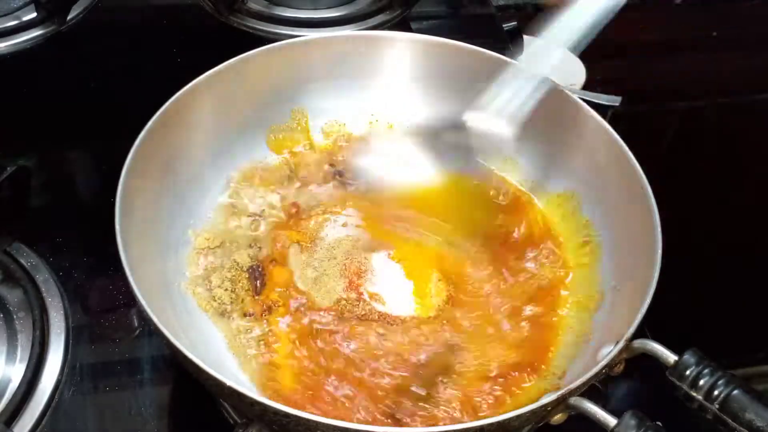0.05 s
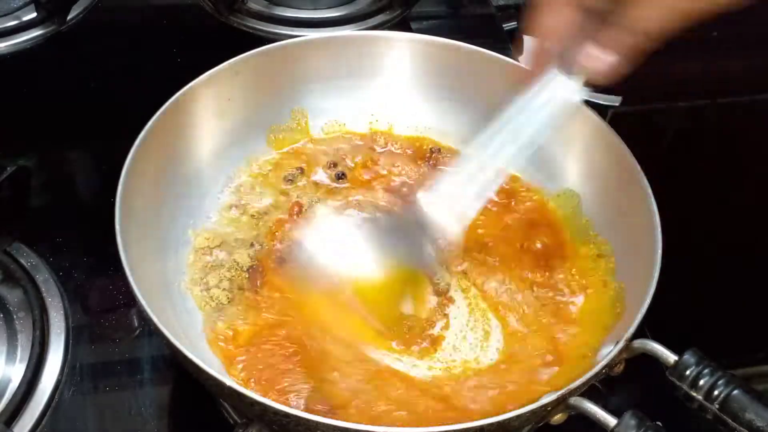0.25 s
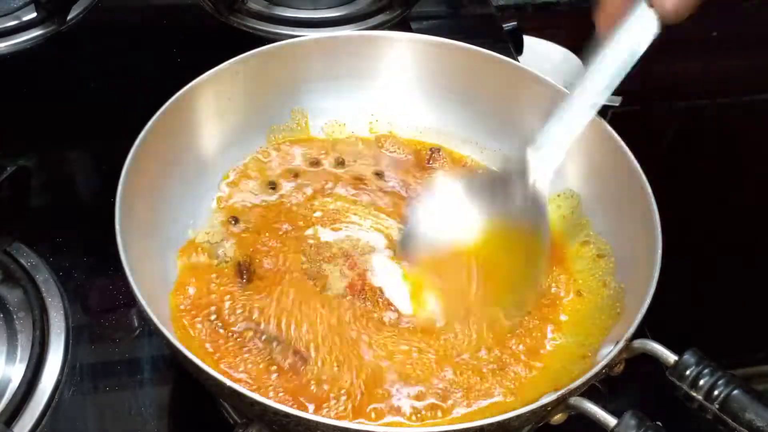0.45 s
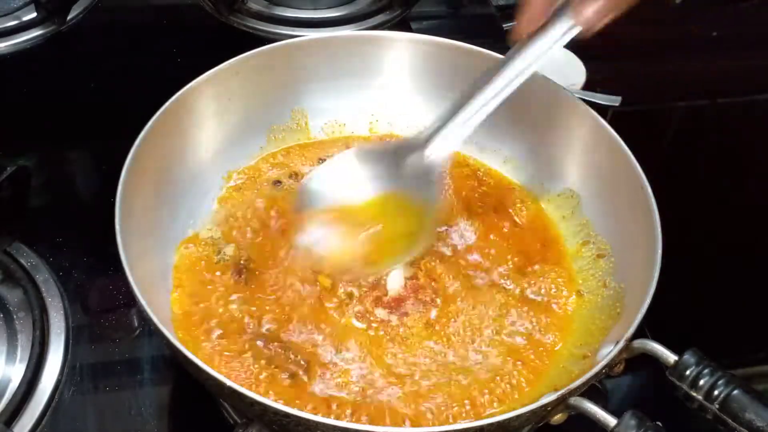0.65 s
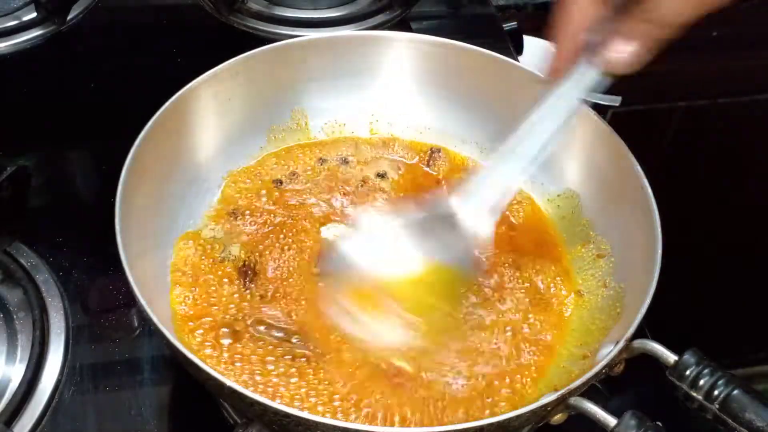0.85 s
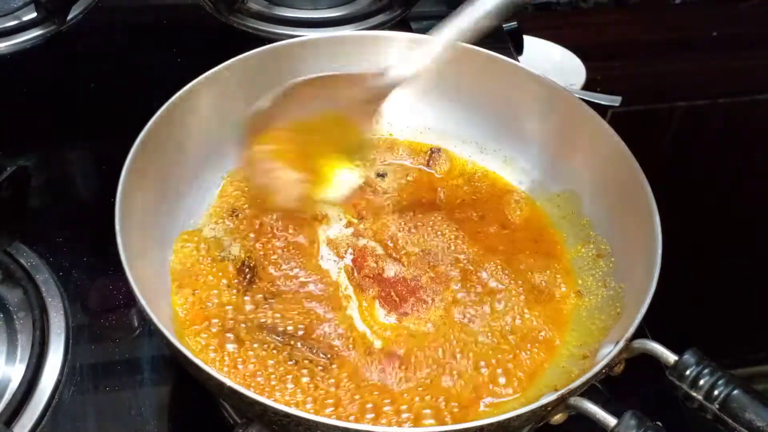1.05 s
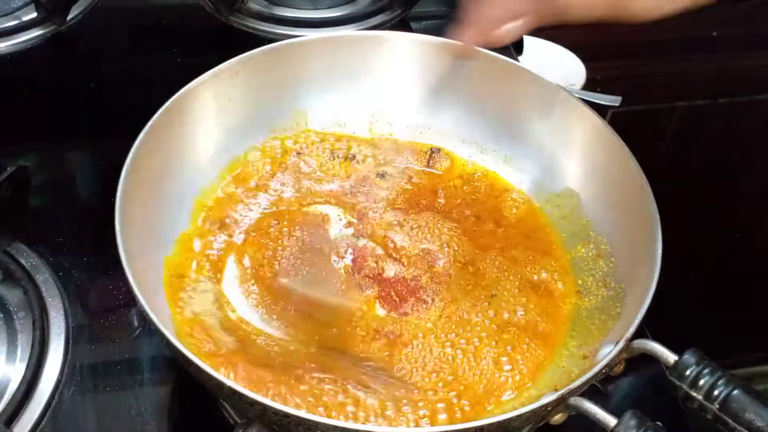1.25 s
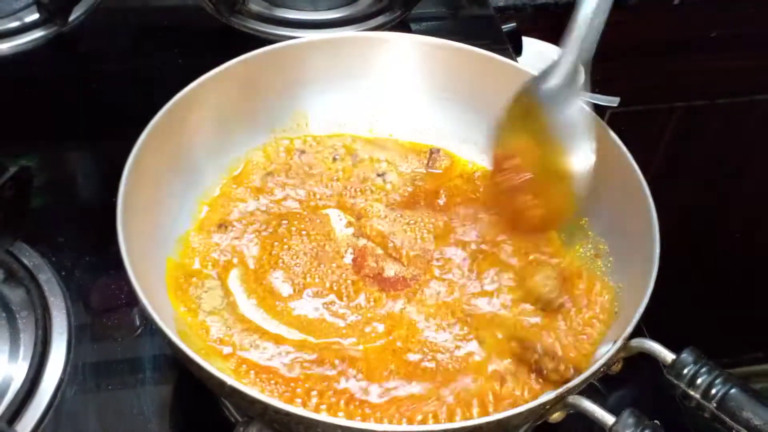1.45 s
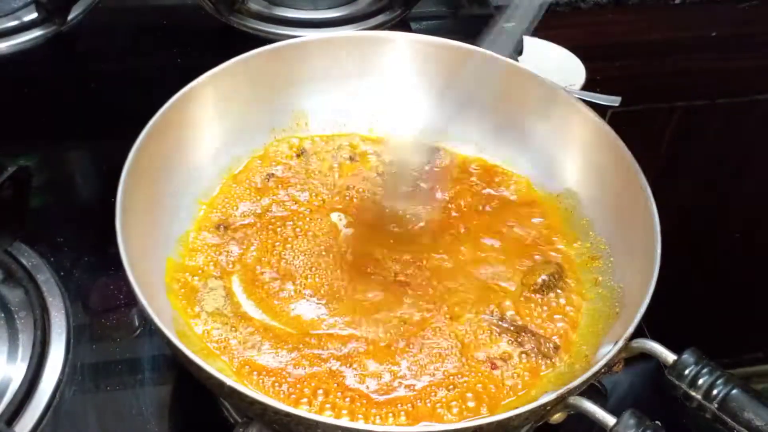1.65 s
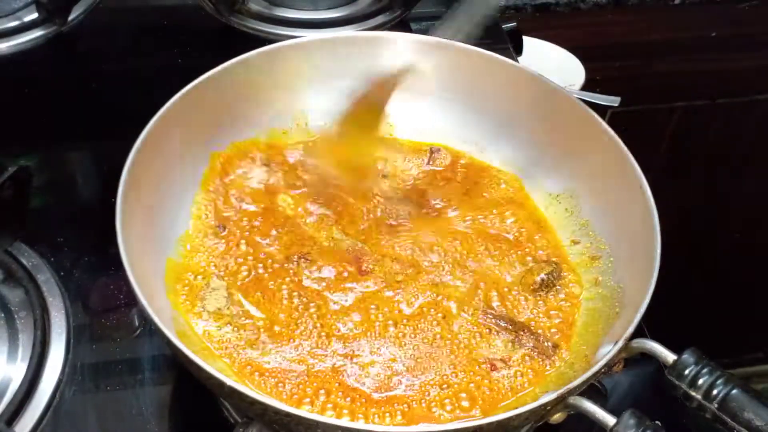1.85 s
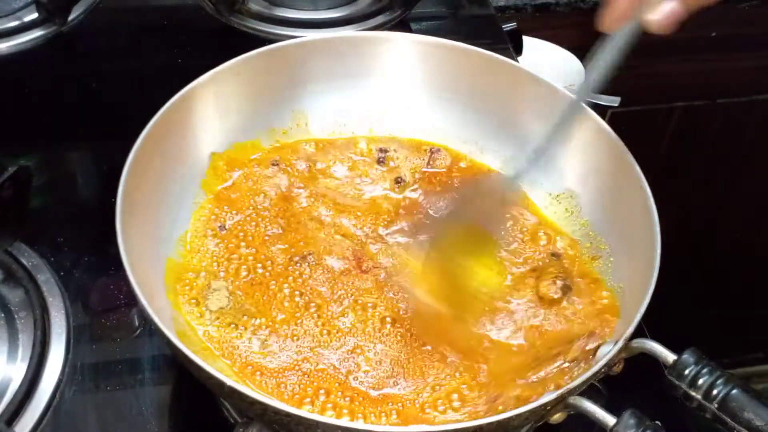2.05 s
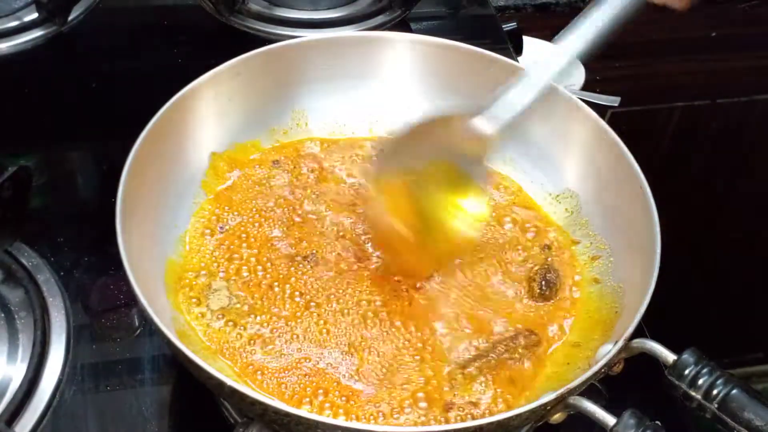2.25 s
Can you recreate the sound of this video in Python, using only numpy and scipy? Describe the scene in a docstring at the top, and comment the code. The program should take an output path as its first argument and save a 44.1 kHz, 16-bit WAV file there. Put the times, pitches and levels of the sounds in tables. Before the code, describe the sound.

A metal ladle stirs and scrapes a thin metal pan, knocking it over lightly sizzling oil

```python
"""Ladle stirring spices in a frying pan

A metal ladle stirs spices frying in oil in a thin metal pan, close by in a home kitchen. Knocks and a
dense run of tiny catches excite the pan's damped modes; the catches also hiss as grit and each knock clinks.
The oil sizzles as dense random pops, with a few pitched spits and one bright swell of hiss.
Dull shaking follows the heavier strokes, a noise tail gives the room, and shaped noise rumbles faintly below."""
import sys
import numpy as np
from scipy import signal
from scipy.fft import rfft, irfft, next_fast_len
from scipy.io import wavfile

SR = 44100
rng = np.random.default_rng(int(sys.argv[2]) if len(sys.argv) > 2 else 0)


def bounce(signal):
    """Save signal as a 16-bit WAV file at the path given by the first command-line argument."""
    frames = np.transpose(np.atleast_2d(signal))
    limited = np.clip(frames, -1, 1)
    pcm = np.round(limited * 32767).astype(np.int16)
    wavfile.write(sys.argv[1], SR, pcm)


def attenuation_scalar(level_db):
    """Turn a level in dB into a linear amplitude multiplier (20 dB per decade)."""
    decades = np.asarray(level_db, float) / 20
    return 10 ** decades


N = 101429  # samples


def rms_one(x):
    """Power normalisation: scale to rms 1."""
    return x / np.sqrt(np.mean(x ** 2) + 1e-20)


def in_time(rows):
    """Linear interpolation: each column of a curve becomes one value a sample."""
    s, *columns = np.transpose(rows)
    return [np.interp(np.arange(N) / SR, s, c) for c in columns]


def filtered(x, order, edge_hz, kind):
    """Butterworth filtering: a passband without ripple."""
    return signal.sosfilt(signal.butter(order, edge_hz, kind, fs=SR, output="sos"), x)


def coloured(x, spectrum):
    """Minimum-phase filtering: x takes the spectrum with nothing sounding early; rms 1."""
    size = next_fast_len(N + 4096)
    hz, db = np.transpose(spectrum)
    bin_hz = np.arange(size // 2 + 1) * SR / size
    log_gain = np.interp(np.log(bin_hz + 1), np.log(hz), db) * np.log(10) / 20
    # folding the cepstrum onto positive times makes the filter causal
    cepstrum = irfft(log_gain, size)
    cepstrum[1:size // 2] *= 2
    cepstrum[size // 2 + 1:] = 0
    response = np.exp(rfft(cepstrum))
    return rms_one(irfft(rfft(x, size) * response, size)[:N])


def drift(rate_hz):
    """Low-passed noise: a slow random wandering of rms 1."""
    r = np.exp(-2 * np.pi * rate_hz / SR)
    noise = rng.standard_normal(N + SR)
    settled = signal.lfilter([1], [1, -2 * r, r * r], noise)[SR:]
    return rms_one(settled)


def ring(clicks, hz, t60_s):
    """Damped resonator: a unit click starts a decaying sine of height 1."""
    r = attenuation_scalar(-60 / (max(t60_s, .003) * SR))
    w = 2 * np.pi * hz / SR
    return signal.lfilter([0, np.sin(w)], [1, -2 * r * np.cos(w), r * r], clicks + 1e-18)


def grains(rate_per_s, spread_db, clump_db):
    """Random point process: clicks of uneven size and either sign, coming in clumps; rms 1."""
    sizes = attenuation_scalar(spread_db * np.minimum(rng.exponential(1, N), 5)) * rng.choice([-1, 1], N)
    present = rng.random(N) < rate_per_s / SR
    clumps = attenuation_scalar(clump_db * drift(21.0))
    return rms_one(sizes * present * clumps)


def clicks_at(s, db):
    """Impulse excitation: one click per time."""
    out = np.zeros(N)
    out[(np.asarray(s) * SR).astype(int)] = attenuation_scalar(db)
    return out


# Spectrum of the room's low noise: hz [Hz], density_db [dB per Hz, relative]
RUMBLE_SPECTRUM = [(12, -3), (135, -7), (210, -25.5), (540, -13), (2000, -18.5), (2600, -81)]


def rumble():
    """Stationary noise shaped by a spectrum: a faint room rumble whose level wavers slowly."""
    level_db, waver_db = -69, 1.5
    level = attenuation_scalar(level_db + waver_db * drift(0.48))
    return level * coloured(rng.standard_normal(N), RUMBLE_SPECTRUM)


# Spectrum of the sizzle: hz [Hz], density_db [dB per Hz, relative]
SIZZLE_SPECTRUM = [(710, -83), (1200, -20.5), (2920, 2), (3510, -2.5), (6060, 0), (7850, -0.5), (8920, -7),
                   (15600, -15.5)]
# Course of the sizzle: time_s [s], level_db [dB]
SIZZLE_COURSE = [(0.0, -54.5), (1.92, -58.5), (2.3, -63)]


def sizzle():
    """Superposition of dense tiny pops: frying oil heard as a continuous hiss."""
    pops_per_s, pop_spread_db = 9000, 1.5
    level_db, = in_time(SIZZLE_COURSE)
    pops = grains(pops_per_s, pop_spread_db, clump_db=1.5)
    return attenuation_scalar(level_db) * coloured(pops, SIZZLE_SPECTRUM)


# Onset of each ladle stroke: start_s [s]
STROKE_STARTS = [0, .134, .207, .338, .42, .494, .541, .63, .788, .93, 1.011, 1.11, 1.17, 1.33, 1.536, 1.62,
                 1.708, 1.77, 1.82, 1.948, 2.02]
# Each stroke over the pan: swell_s [s], hold_s [s], middle_ring_db [dB], deep_ring_db [dB],
# high_ring_db [dB], grit_db [dB]
LADLE_STROKES = [(0.0016, 0.1, -64, -63, -66, -54), (0.0018, 0.044, -65, -79, -56.5, -60),
                 (0.01, 0.024, -53.5, -79, -46.5, -46), (0.023, 0.018, -39, -44.5, -48.5, -42.5),
                 (0.0078, 0.073, -49, -60, -62, -51), (0.0029, 0.034, -41, -58, -48, -46),
                 (0.0018, 0.037, -43.5, -50, -51, -47.5), (0.012, 0.015, -50.5, -90, -77, -55.5),
                 (0.053, 0.039, -44, -57, -47.5, -45.5), (0.012, 0.16, -65.5, -62.5, -59.5, -54),
                 (0.0037, 0.087, -40.5, -45, -44, -46.5), (0.012, 0.12, -72, -47, -51.5, -47),
                 (0.0067, .11, -48, -44.5, -44.5, -40.5), (0.006, 0.045, -95, -79, -57, -56),
                 (0.022, 0.027, -39.5, -39.5, -42.5, -41.5), (.005, 0.083, -57, -57.5, -58, -52.5),
                 (0.0064, 0.021, -38.5, -47, -44, -41), (0.023, 0.026, -69, -44.5, -62, -47),
                 (0.012, 0.036, -58, -40.5, -46, -40), (0.0056, 0.041, -54, -64, -46, -45.5),
                 (0.002, 0.042, -56.5, -62, -56.5, -54)]


def drag():
    """Addition of powers: strokes enter at once, swell, hold and fade in four layers of strength."""
    press_db_per_s, sag_db_per_s, lift_db_per_s = 220, 40.5, 343  # swelling, easing while held, lifting
    t, power = np.arange(N) / SR, 0
    for start_s, (swell_s, hold_s, *levels_db) in zip(STROKE_STARTS, LADLE_STROKES):
        since_peak = t - start_s - swell_s
        db = (press_db_per_s * np.minimum(since_peak, 0)
              - sag_db_per_s * np.maximum(since_peak, 0)
              - lift_db_per_s * np.maximum(since_peak - hold_s, 0))
        course = attenuation_scalar(2 * db) * (t >= start_s)
        power = power + np.outer(attenuation_scalar(2 * np.array(levels_db)), course)
    return np.sqrt(power)


# Spectrum of the gritty scrape: hz [Hz], density_db [dB per Hz, relative]
GRIT_SPECTRUM = [(150, -15), (250, -16), (853, 8), (1170, 1), (1360, 7.5), (1890, -6), (4980, -2),
                 (15600, -28)]


def grit(catches, strength):
    """Broadband friction noise: the catches of the drag also hiss."""
    return strength * coloured(catches, GRIT_SPECTRUM)


def nearness_db(hz, contact_hz):
    """Selective excitation: modes near the pitch of the contact gain strength."""
    focus_db, focus_octaves = 13, .13
    return focus_db * np.exp(-.5 * (np.log2(hz / contact_hz) / focus_octaves) ** 2)


# Knocks of the ladle: start_s [s], blow_db [dB, before coupling to the pan], pitch_hz [Hz], clink_db [dB]
LADLE_KNOCKS = [(0.135, -46.5, 1680, -49), (0.212, -41, 2590, -30), (0.3326, -39, 2590, -40),
                (0.359, -27, 2000, -41), (0.494, -29, 1970, -34), (0.542, -25, 1850, -63),
                (0.788, -44, 3000, -43.5), (0.859, -35, 2830, -47), (1.012, -25, 2940, -38),
                (1.186, -64, 2430, -41), (1.2568, -39, 1410, -37.5), (1.536, -46, 2750, -32),
                (1.707, -29.5, 2500, -22.5), (1.824, -30, 2300, -38), (1.8423, -28.5, 3030, -32),
                (1.959, -35.5, 2560, -45), (2.021, -49, 2500, -38)]
# Modes of the pan in three groups, damped by the oil: pitch_hz [Hz], level_db [dB, relative]
DEEP_MODES = [(300, -10), (343, 0), (384, 1), (461, 1.5), (489, 1), (665, -28)]
MIDDLE_MODES = [(730, -15), (789, -0.5), (851, 7), (893, 5.5), (950, -7), (981, 0), (1024, 3), (1106, -8)]
HIGH_MODES = [(1235, -4), (1320, -4), (1580, -2.5), (1690, -6), (1810, 2), (2078, 3.5), (2280, -2.5),
              (2390, 0), (2500, -2.5), (2660, 0.5), (2760, -5), (2880, -3.5), (3100, -10)]


def pan():
    """Modal superposition: catches of the drag and knocks strike the same damped modes."""
    catches_per_s, catch_spread_db, catch_clump_db = 3000, 3, 1.8
    coupling_db, knock_spread_db = -17, 3
    knock_band_hz = [720, 5340]  # a light knock barely moves the deep modes
    wander_db, wander_hz = 3.5, 4  # each mode waxes and wanes as the ladle moves over the pan
    focus_fade_s = .12  # the favour for the last pitch fades as the ladle moves on
    ring_cycles = 110  # longest ring of a mode, in periods per 60 dB of decay
    middle, deep, high, grit_strength = drag()
    groups = (  # modes, longest T60 (s), drag strength, knock level (dB)
        (DEEP_MODES, .045, deep, -12),
        (MIDDLE_MODES, .12, middle, 0),
        (HIGH_MODES, .045, high, -18))

    s, blow_db, clink_hz, _ = np.transpose(LADLE_KNOCKS)
    t = np.arange(N) / SR
    last = np.maximum(np.searchsorted(s, t) - 1, 0)
    contact_hz = clink_hz[last]
    fresh = np.exp(-((t - s[last]) / focus_fade_s) ** 2)

    catches = grains(catches_per_s, catch_spread_db, catch_clump_db)
    out = grit(catches, grit_strength)
    for modes, longest_s, strength, knock_db in groups:
        t60_s = [min(longest_s, ring_cycles / hz) for hz, _ in modes]
        share = [attenuation_scalar(level_db + wander_db * drift(wander_hz) + fresh * nearness_db(hz, contact_hz))
                 for hz, level_db in modes]
        # dividing by the energy of all the decays lets strength set the level of the group
        energy = sum(gain ** 2 * ring_s * SR / (4 * np.log(1000)) for gain, ring_s in zip(share, t60_s))
        drive = strength * catches / np.sqrt(energy)
        for k, (hz, level_db) in enumerate(modes):
            uneven_db = knock_spread_db * rng.standard_normal(len(s))
            mode_db = level_db + nearness_db(hz, clink_hz)
            blows = clicks_at(s, blow_db + mode_db + coupling_db + knock_db + uneven_db)
            soft_blows = filtered(blows + 1e-18, 3, knock_band_hz, "band")
            sign = (-1) ** k  # neighbouring modes answer the drag in opposite phase
            out = out + ring(sign * share[k] * drive + soft_blows, hz, t60_s[k])
    return out


def thrum():
    """Noise modulated by the deep ring's strength: the pan shakes dully on its stand."""
    level_db, band_hz = -13.5, [134, 750]  # level relative to the deep ring
    _, deep, _, _ = drag()
    shaking = rms_one(filtered(rng.standard_normal(N), 2, band_hz, "band"))
    return attenuation_scalar(level_db) * deep * shaking


# Spits of oil: start_s [s], level_db [dB], pitch_hz [Hz]
OIL_SPITS = [(0.012, -43, 6340), (0.1025, -42, 8400), (0.6667, -39.5, 7300), (1.7254, -40, 6480)]


def spits():
    """Impulse response of a damped resonance: a few louder, pitched spits of oil."""
    return sum(ring(clicks_at([s], db), hz, t60_s=.008) for s, db, hz in OIL_SPITS)


def ladle():
    """Free vibration after impact: each knock gives a short clink at its own pitch."""
    return sum(ring(clicks_at([s], clink_db), hz, t60_s=.011) for s, _, hz, clink_db in LADLE_KNOCKS)


def flare():
    """High-passed noise under a Gaussian envelope: one brief swell of fine bright hiss from the oil."""
    noise_db, centre_s, width_s = -53.5, .868, .018  # level of the noise before its high-pass
    t = np.arange(N) / SR
    swell = attenuation_scalar(noise_db) * np.exp(-.5 * ((t - centre_s) / width_s) ** 2)
    return swell * filtered(rng.standard_normal(N), 2, 7000, "high")


def kitchen(x):
    """Exponential reverberant decay: a dull tail of dying noise, starting a few milliseconds late."""
    t60_s, level_db, wall_cut_hz = .42, -17, 6000
    t = np.arange(SR // 2) / SR
    tail = rng.standard_normal(len(t)) * attenuation_scalar(-60 * t / t60_s) * (t > .004)
    tail = filtered(tail, 1, wall_cut_hz, "low")
    unit_tail = tail / np.sqrt(np.sum(tail ** 2))
    return attenuation_scalar(level_db) * signal.fftconvolve(x, unit_tail)[:N]


def scene():
    """Linear superposition: pan, ladle and oil with their reverberation, over the room's rumble."""
    metal = filtered(pan() + ladle(), 3, 292, "high")  # thin metal radiates no bass
    near = metal + thrum() + sizzle() + spits() + flare()
    return (near + kitchen(near) + rumble())[None]


def top_cut(x):
    """Nothing passes above the cut-off."""
    return signal.sosfilt(signal.butter(12, 15740, fs=SR, output="sos"), x)


def record(dry):
    """Unity gain: the finished mix is passed on at its own level."""
    return top_cut(dry)


dry = scene()
out = record(dry)
bounce(out)
```